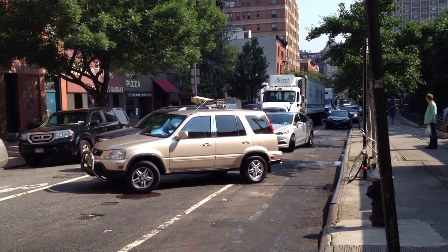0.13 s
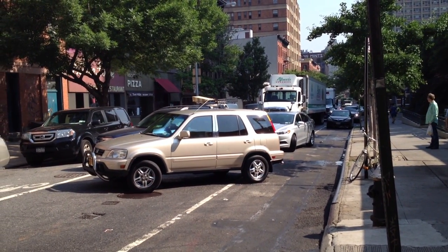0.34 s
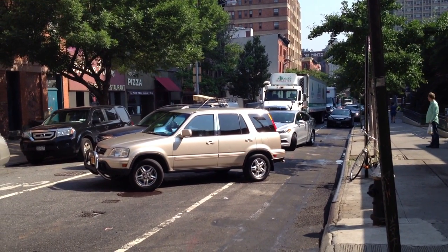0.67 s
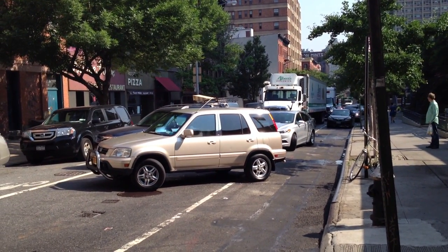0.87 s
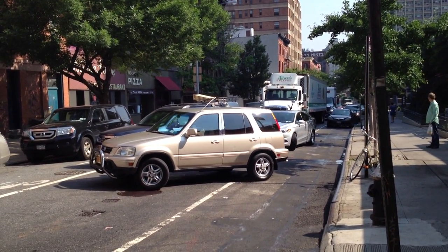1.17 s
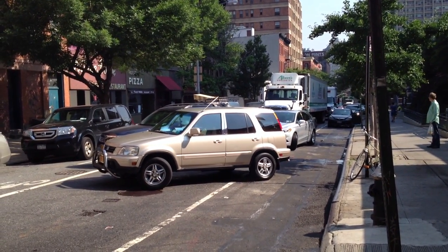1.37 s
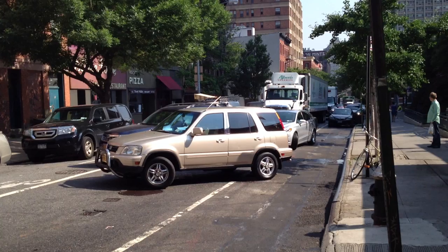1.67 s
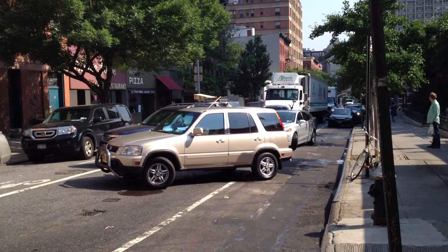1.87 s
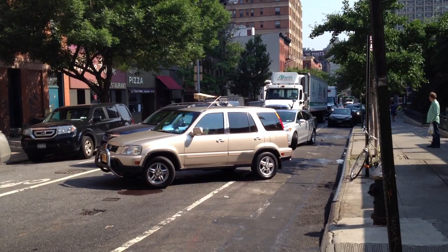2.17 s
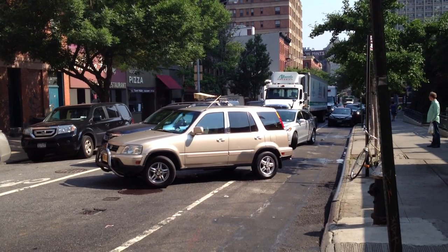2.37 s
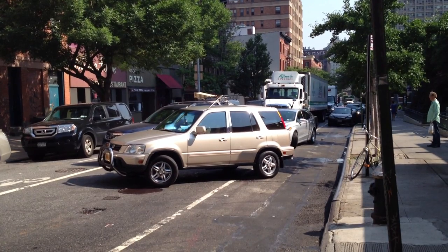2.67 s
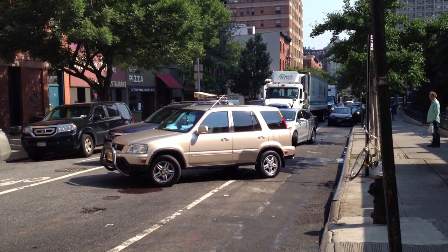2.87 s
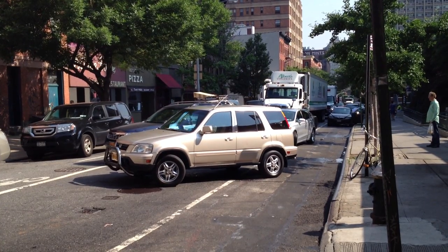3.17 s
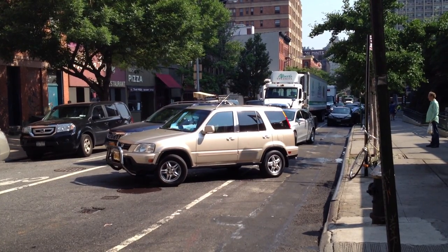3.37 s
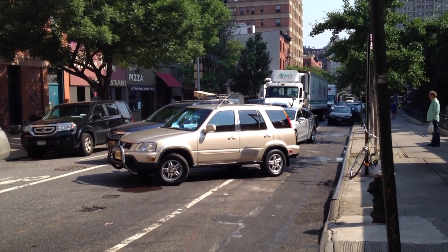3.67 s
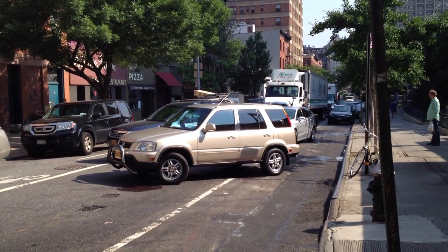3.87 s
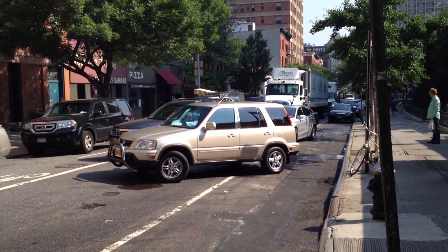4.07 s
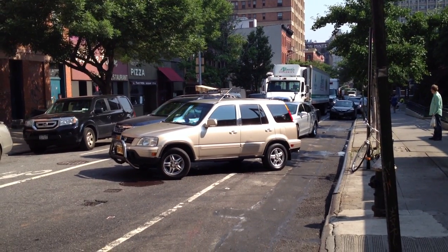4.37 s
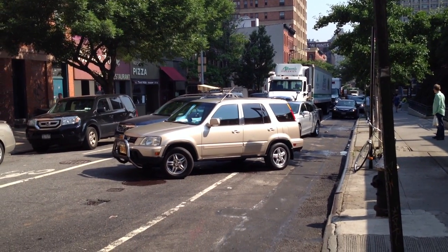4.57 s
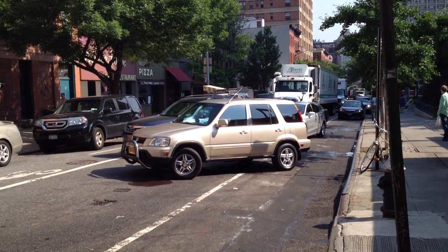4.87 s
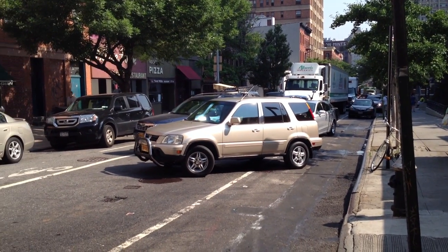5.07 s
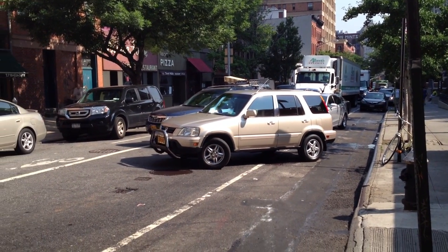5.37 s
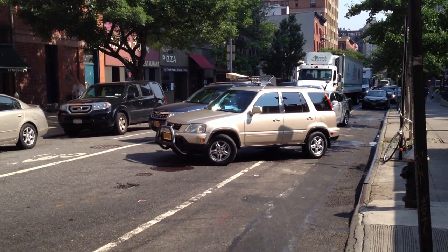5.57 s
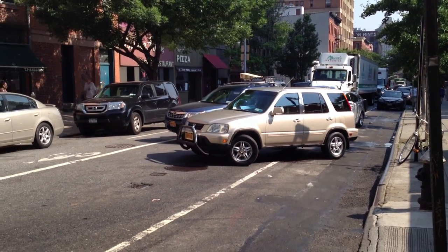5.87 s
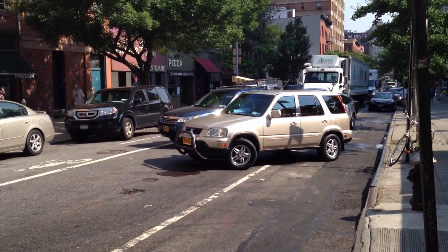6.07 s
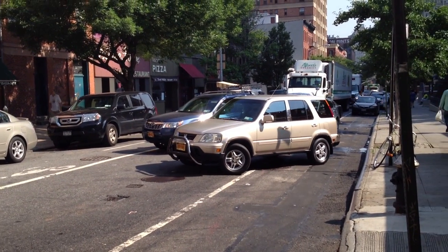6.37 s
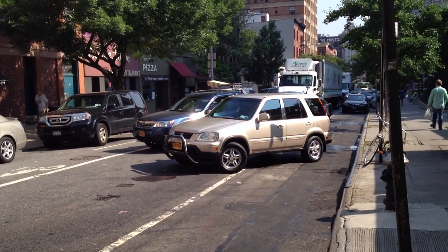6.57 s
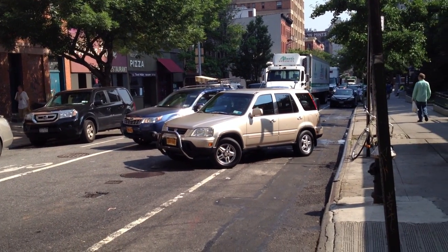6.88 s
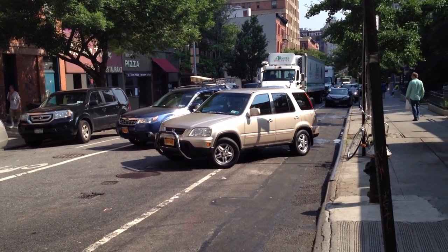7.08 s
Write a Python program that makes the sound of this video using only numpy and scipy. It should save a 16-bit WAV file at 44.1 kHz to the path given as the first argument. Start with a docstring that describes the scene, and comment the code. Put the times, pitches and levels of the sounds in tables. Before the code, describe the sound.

Dull hum of queued car and truck engines with faint brake squeals, a sharp handling knock, a loud pop, a dropout, then clearer traffic.

```python
"""A queue of cars and a truck idles in a city street: coloured noise for the many exhausts, fans and tyres,
wavering sines for the nearest engine and the truck, thin gliding sines for the brakes.
A finger partly covers the microphone port and muffles the street; it slides with a rub of filtered grains,
a sharp juddering knock of falling pitch and smaller catches of damped rings, and rests more loosely.
Then a pop, the sound drops out for most of a second, and the street returns open and bright."""
import sys
import numpy as np
from scipy import signal
from scipy.io import wavfile

SR = 44100
rng = np.random.default_rng(int(sys.argv[2]) if len(sys.argv) > 2 else 0)


def file_out(sig):
    """Save sig as 16-bit WAV at sys.argv[1]."""
    # one column per channel
    cols = np.atleast_2d(sig).T
    # limit, then scale
    lim = np.clip(cols, -1, 1)
    pcm = np.round(lim * 32767).astype(np.int16)
    wavfile.write(sys.argv[1], SR, pcm)


N = 318843
TIME = np.arange(N) / SR
SILENT_FROM_S, SILENT_TO_S = 5.834, 6.682

# traffic while the port is covered, loose and open, one list each:
# time [s], exhaust_rumble [dB], fan_and_tyre_noise [dB]
TRAFFIC_LEVELS = [
    [(0.0, -32.6, -35.4), (1.8, -32, -35.7), (3.6, -30.8, -35.2)],
    [(4.45, -33.4, -37), (5.1, -36.6, -34.5), (5.8, -37.6, -35.4)],
    [(6.72, -32.4, -37.4), (7.2, -31.6, -37.4)],
]


def street(spectrum):
    """Incoherent sum of many sources: exhaust noise below, fan and tyre noise above, each swelling on its own."""
    rumble_db, wash_db = in_time(np.vstack(TRAFFIC_LEVELS))
    noise = coloured(rng.standard_normal(N), spectrum)
    low = signal.sosfiltfilt(signal.butter(4, 600, fs=SR, output="sos"), noise)
    high = noise - low
    rumble = low / np.std(low) * from_db(rumble_db + 0.7 * drift(12))
    # the level of the upper part is set by what lies below 1800 Hz
    wash = high / np.std(band(high, 1800, "low")) * from_db(wash_db + 0.6 * drift(25))
    return rumble + wash


# spectrum of the street through a covered, a loosely covered and an open port: frequency [Hz], density [dB per Hz]
COVERED_SPECTRUM = [(40, -51.0), (65, -41.5), (115, -24.0), (175, -5.0), (340, -0.8), (510, -6.5),
                    (570, -6.0), (780, -10.5), (1250, -11.0), (1650, -17.5), (2250, -34.5), (3000, -42.5),
                    (3800, -45.5), (6000, -46.0), (7800, -55.0), (11500, -53.0), (15000, -56.0)]
LOOSE_SPECTRUM = [(40, -48), (65, -40), (115, -19), (165, -3), (300, 0), (450, -6), (850, -9), (1200, -7.3),
                  (1680, -7.3), (2200, -16.3), (3100, -23.5), (4000, -34), (6200, -36.5), (7700, -51),
                  (10500, -54.5), (14500, -50)]
OPEN_SPECTRUM = [(40, -35.5), (110, -13.0), (170, 2.0), (270, -1.5), (400, -3.0), (470, -12.0), (550, -5.5),
                 (950, -13.0), (2800, -18.5), (4700, -19.5), (5200, -24.0), (8400, -28.0), (9600, -33.0),
                 (13500, -36.0), (15000, -43.0)]
# resonance of the air gap under the finger: time [s], resonance [Hz], level [dB]
GAP_RESONANCE = [(0, 5600, -70), (3.6, 5590, -75), (4.35, 6014, -64), (4.52, 6000, -54), (4.85, 6000, -64),
                 (5.8, 5704, -62)]
LEAK_POWER = 3   # treble leaks in with the cube of the gap's width


def traffic():
    """Acoustic filtering by an aperture: the port colours the street, and the air gap under the finger resonates."""
    leak = looseness() ** LEAK_POWER
    # the two powers always add up to one
    muffled = np.sqrt(1 - leak) * street(COVERED_SPECTRUM) + np.sqrt(leak) * street(LOOSE_SPECTRUM)
    gap_hz, gap_db = in_time(GAP_RESONANCE)
    # slow noise on a carrier makes a narrow band of noise around the resonance
    gap = from_db(gap_db) * rms_one(drift(450) * np.sin(turning(gap_hz)))
    return np.where(TIME < SILENT_FROM_S, muffled + gap, street(OPEN_SPECTRUM))


# the nearest engine creeps up and sinks back: time [s], firing_rate [Hz]
FIRING_RATE = [(0, 97), (0.28, 95), (0.72, 101.5), (1.9, 98), (2.6, 103), (3.1, 105.6), (3.65, 101.3),
               (4.3, 102), (5.1, 92), (5.8, 90.9), (7.23, 101)]
# its deep firing tone: time [s], level [dB]
FIRING_TONE_LEVEL = [(0, -54), (0.45, -51.5), (0.78, -59), (1.05, -52.5), (1.48, -63), (1.85, -53),
                     (2.2, -68), (3.4, -61), (3.9, -56), (4.9, -57), (5.2, -65), (5.8, -62), (6.7, -53)]
# load on the engine, as the mean level of its exhaust note: time [s], level [dB]
EXHAUST_NOTE_LEVEL = [(0, -38), (0.33, -33.5), (0.53, -43), (0.76, -33), (0.95, -39), (1.65, -43),
                      (2.0, -36), (2.3, -36), (2.6, -32.5), (3.0, -30.5), (3.3, -35), (3.65, -32),
                      (4.1, -39), (4.45, -37), (5.0, -48), (7.23, -40)]
NOTE_WAVER_DB, OVERTONES_DB = 2.3, -48


def car_engine():
    """Whole and half orders of the firing rate turn with one engine; uneven firing makes the exhaust note and
    overtones waver in level and phase."""
    firing_hz, = in_time(FIRING_RATE)
    firing_db, = in_time(FIRING_TONE_LEVEL)
    note_db, = in_time(EXHAUST_NOTE_LEVEL)
    phase = turning(firing_hz)
    firing = from_db(firing_db) * np.sin(phase)
    note = from_db(note_db + NOTE_WAVER_DB * drift(7)) * np.sin(3 * phase + 0.55 * drift(9))
    overtones = np.zeros(N)
    for multiple in (3.5, 4, 4.5, 5.5):
        overtones += from_db(3 * drift(4)) * np.sin(multiple * phase + 0.8 * drift(5))
    return firing + note + from_db(OVERTONES_DB) * overtones


# the truck's drone: time [s], pitch [Hz]
TRUCK_PITCH_CURVE = [(0, 240), (0.6, 234), (1.0, 248), (2.7, 247), (3.7, 242), (4.2, 249), (4.9, 255),
                     (5.25, 267), (7.23, 261)]
DRONE_COVERED_DB, DRONE_LOOSE_DB, DRONE_OPEN_DB = -38.8, -41, -36.8   # level through each state of the port
TRUCK_SWELL_S, TRUCK_SWELL_DB = 1.0, 8   # it swells at the start as the truck takes up load
DRONE_WAVER_DB = 3.2


def truck_drone():
    """Amplitude and phase modulation of one tone: uneven firing makes the truck's drone waver."""
    truck_hz, = in_time(TRUCK_PITCH_CURVE)
    under_finger_db = DRONE_COVERED_DB + (DRONE_LOOSE_DB - DRONE_COVERED_DB) * looseness()
    level_db = np.where(TIME < SILENT_FROM_S, under_finger_db, DRONE_OPEN_DB)
    level_db = level_db - TRUCK_SWELL_DB * np.maximum(1 - TIME / TRUCK_SWELL_S, 0)
    return from_db(level_db + DRONE_WAVER_DB * drift(8)) * np.sin(turning(truck_hz) + 0.65 * drift(8))


# faint brake squeals: start [s], end [s], first_pitch [Hz], last_pitch [Hz], level [dB]
BRAKE_SQUEALS = [(-0.15, 0.25, 1700, 1716, -42), (0.1, 0.52, 1705, 1785, -49.5),
                 (0.45, 0.95, 1026, 1022, -44), (0.55, 0.95, 2042, 2040, -54), (0.6, 1.7, 1855, 1812, -54),
                 (4.9, 5.7, 1665, 1635, -45)]


def brakes():
    """Frictional squeal: thin tones that swell, glide and fade as cars creep forward."""
    out = np.zeros(N)
    for start_s, end_s, first_hz, last_hz, level_db in BRAKE_SQUEALS:
        progress = np.clip((TIME - start_s) / (end_s - start_s), 0, 1)
        pitch_hz = first_hz + (last_hz - first_hz) * progress
        tone = np.sin(turning(pitch_hz * (1 + 0.0015 * drift(8))))
        out += from_db(level_db + 1.5 * drift(10)) * np.sin(np.pi * progress) * tone
    return out


LOOSENS_FROM_S, LOOSENS_TO_S = 3.7, 5.08   # the finger eases off the port


def looseness():
    """Aperture width: 0 while the finger presses on the port, 1 once it has eased off."""
    return np.interp(TIME, [LOOSENS_FROM_S, LOOSENS_TO_S], [0, 1])


# strokes of the finger on the case; attack and release are the times for 20 dB:
# start [s], attack [s], hold [s], release [s], drag before its bass cut [dB], skin_hiss [dB]
FINGER_STROKES = [(3.65, .036, .06, .1, -46, -55), (3.742, .018, .02, .02, -37, -40),
                  (3.767, .03, .055, .25, -32.3, -34.5), (3.93, .11, .017, .04, -27, -41),
                  (3.995, .04, .103, .05, -24.7, -32.8), (4.125, .02, .036, .016, -29.5, -39),
                  (4.196, .026, .017, .012, -30, -28.5), (4.22, .01, .1, .2, -34.5, -52),
                  (4.335, .036, .025, .07, -38, -44.5), (4.45, .1, .38, .1, -46, -62),
                  (4.959, .008, .008, .02, -39, -43.5), (5.011, .01, .014, .1, -43, -46.5)]
# spectra of the drag (before its bass cut) and of the hiss: frequency [Hz], density [dB per Hz]
DRAG_SPECTRUM = [(40, -44), (90, -22), (170, 2), (500, -3.5), (1400, 2), (2400, -3), (3300, -22),
                 (6000, -38)]
HISS_SPECTRUM = [(1000, -15), (2500, 4.5), (3600, -0.5), (6000, 0.5), (8000, -7), (10000, -18.5),
                 (15000, -16.5)]


def finger_slide():
    """Stick-slip friction: thousands of tiny skin slips make a dull drag in the case and a hiss at the port."""
    drag_gain, hiss_gain = 0, 0
    for start_s, attack_s, hold_s, release_s, drag_db, hiss_db in FINGER_STROKES:
        pressure = swell(start_s, attack_s, hold_s, release_s)
        # overlapping strokes add in power
        drag_gain = np.hypot(drag_gain, from_db(drag_db) * pressure)
        hiss_gain = np.hypot(hiss_gain, from_db(hiss_db) * pressure)
    drag_grains = coloured(grains(per_s=3200, spread_db=2.8), DRAG_SPECTRUM)
    hiss_grains = coloured(grains(per_s=10000, spread_db=2.8), HISS_SPECTRUM)
    drag = drag_gain * from_db(1.6 * drift(60)) * drag_grains
    hiss = hiss_gain * from_db(1.2 * drift(60)) * hiss_grains
    return band(drag, 130, "high") + hiss


# the fingertip catches and lets go, before bass cut and overload:
# time [s], level [dB], ring_pitch [Hz], crisp_share [dB]
FINGERTIP_CATCHES = [(3.9335, -8, 1600, -14), (3.9435, -8, 1400, -16), (3.975, -8, 1300, -18),
                     (3.9775, -9, 2100, -16), (3.985, -9, 150, -30), (4.0195, -7, 1400, -18),
                     (4.033, -3, 190, -26), (4.0335, -4, 650, -14), (4.0398, -3, 1400, -12),
                     (4.049, -4, 1100, -14), (4.078, -9, 600, -18), (4.0925, -5, 1500, -14),
                     (4.096, -5, 2200, -14), (4.111, -6, 1400, -16), (4.199, -13, 2100, -3),
                     (4.206, -10, 2400, -2), (4.215, -10, 1700, -3), (4.2347, 1, 1600, -21),
                     (4.2363, -9, 2300, -16), (4.238, -11, 2100, -5), (4.243, -1, 2100, -21),
                     (4.283, -24, 2400, -4), (4.378, -9, 1500, -24), (4.39, -10, 2200, -18),
                     (4.438, -19, 2500, -22), (4.659, -22, 2700, -18), (4.678, -19.5, 2200, -17),
                     (4.804, -13.5, 1900, -19), (4.826, -23, 3000, -12), (4.864, -17, 2800, -22),
                     (4.938, -18, 2900, -10), (4.945, -24, 90, -30), (4.961, -19, 2200, -4),
                     (4.981, -17, 2200, -14), (5.3893, -13, 1900, -5), (5.633, -22, 2000, -8)]
BASS_CUT_HZ = 190
OVERLOAD = 0.82   # amplitude at which the microphone clips


def finger_catches():
    """Amplitude limiting: knocks and the judder overload the microphone, which passes little bass."""
    knocks = judder() + sum(knock(*row) for row in FINGERTIP_CATCHES)
    thinned = band(knocks, BASS_CUT_HZ, "high", order=2)
    return band(np.clip(thinned, -OVERLOAD, OVERLOAD), BASS_CUT_HZ / 2, "high", order=2)


# the sharp knock, as the fingertip judders over the port
JUDDER_START_S, JUDDER_LENGTH_S = 3.9791, 0.0056
JUDDER_FIRST_HZ, JUDDER_LAST_HZ = 1300, 330
JUDDER_DB = -0.5
JUDDER_OCTAVE_DB, JUDDER_RASP_DB, JUDDER_THUMP_DB = -7, -4, -4.5   # relative to the shudder
JUDDER_THUMP_HZ = 270
# spectrum of the skidding rasp: frequency [Hz], density [dB per Hz]
RASP_SPECTRUM = [(100, -6), (250, 3), (600, -3), (2500, 1), (4500, -4), (8000, -10), (15000, -15)]


def judder():
    """Stick-slip in a few hard shudders of falling pitch: the fingertip skids with a rasp and thumps the case."""
    moving = TIME > JUDDER_START_S
    progress = np.clip((TIME - JUDDER_START_S) / JUDDER_LENGTH_S, 0, 1)
    pitch_hz = JUDDER_FIRST_HZ + (JUDDER_LAST_HZ - JUDDER_FIRST_HZ) * progress
    phase = turning(pitch_hz * moving)
    shudder = np.sin(phase) + from_db(JUDDER_OCTAVE_DB) * np.sin(2 * phase)
    rasp = from_db(JUDDER_RASP_DB) * progress * coloured(rng.standard_normal(N), RASP_SPECTRUM)
    thump = from_db(JUDDER_THUMP_DB) * np.sin(turning(JUDDER_THUMP_HZ * moving))
    envelope = np.sqrt(np.abs(np.sin(np.pi * progress)))
    return from_db(JUDDER_DB) * envelope * (shudder + rasp + thump)


RING_S, RING_CYCLES = 0.0015, 3.5   # a ring falls 60 dB in this time plus a few cycles of its pitch
CAVITY_TOP_HZ = 3400   # the hollow under the finger passes little above this
EDGE_S = 0.004   # the crisp edge falls 60 dB in this time


def knock(start_s, level_db, ring_hz, crisp_db):
    """Damped cavity resonance: the hollow rings for a few cycles, and contact adds a crisp, broad edge."""
    age = TIME[:SR // 20]
    ring_t60 = RING_S + RING_CYCLES / ring_hz
    onset = np.minimum(2 * ring_hz * age, 1)   # soft skin takes half a cycle to drive the cavity
    ring = np.sin(2 * np.pi * ring_hz * age) * onset * np.exp(-np.log(1000) * age / ring_t60)
    ring = band(ring, CAVITY_TOP_HZ, "low", order=6)
    edge = band(rng.standard_normal(len(age)), 6000, "low", order=2)
    edge = edge * np.exp(-np.log(1000) * age / EDGE_S)
    out, at = np.zeros(N), round(start_s * SR)
    out[at:at + len(age)] = from_db(level_db) * (ring + from_db(crisp_db) * edge)
    return out


# faint ticks within the dropout: time [s], level [dB], ring_pitch [Hz], crisp_share [dB]
DROPOUT_TICKS = [(5.9485, -56, 2500, 4), (5.9993, -49, 1600, 2)]
# faint bumps within the dropout: time [s], level [dB]
DROPOUT_BUMPS = [(5.9375, -50), (5.9997, -48.5)]


def dropout(sound):
    """Gating: one hard pop, a brief faint crackle with ticks and bumps, then silence until the sound snaps back."""
    bumps = sum(bump(*row) for row in DROPOUT_BUMPS)
    ticks = sum(knock(*row) for row in DROPOUT_TICKS)
    live = (TIME < SILENT_FROM_S) | (TIME > SILENT_TO_S)
    return np.where(live, sound, pop_tail() + crackle() + bumps + ticks) + pop()


POP_S, POP_DB = 5.8336, -0.8
POP_PUSH_S, POP_FALL_S = 0.000105, 0.00066


def pop():
    """Bipolar impulse: it jumps up, flips to the opposite extreme and runs back to rest."""
    corners_s = np.cumsum([0, 1.5 / SR, POP_PUSH_S, 1.5 / SR, POP_FALL_S])
    return from_db(POP_DB) * np.interp(TIME - POP_S, corners_s, [0, 1, 1, -1, 0])


POP_TAIL_DB, POP_TAIL_S = -54, 0.05   # level before the low-pass; time to fall 20 dB
POP_TAIL_ENDS_S = 5.867   # where it is cut short


def pop_tail():
    """Exponential decay of low-passed noise: the dull tail of the pop."""
    noise = band(coloured(rng.standard_normal(N), COVERED_SPECTRUM), 1400, "low", order=8)
    decay = swell(POP_S, POP_PUSH_S, POP_FALL_S, POP_TAIL_S)
    return from_db(POP_TAIL_DB) * decay * noise * (TIME < POP_TAIL_ENDS_S)


CRACKLE_START_S, CRACKLE_HOLD_S, CRACKLE_RELEASE_S, CRACKLE_DB = 5.937, 0.153, 0.018, -69
# spectrum of the crackle: frequency [Hz], density [dB per Hz]
CRACKLE_SPECTRUM = [(40, -14), (150, -8), (400, -9), (1500, -12), (5000, -10), (15000, -10)]


def crackle():
    """Random impulse train: dense tiny clicks of uneven size, filtered to a faint crackle."""
    clicks = coloured(grains(per_s=6000, spread_db=4.6), CRACKLE_SPECTRUM)
    return from_db(CRACKLE_DB) * swell(CRACKLE_START_S, 0.004, CRACKLE_HOLD_S, CRACKLE_RELEASE_S) * clicks


BUMP_HZ, BUMP_FALL_S = 160, 0.008   # swing of a bump; time to fall 20 dB


def bump(start_s, level_db):
    """Damped step response: a crisp edge that swings back to rest with a short thud."""
    age = np.maximum(TIME - start_s, 0)
    swing = (TIME > start_s) * np.cos(2 * np.pi * BUMP_HZ * age)
    return from_db(level_db) * swing * swell(start_s, BUMP_FALL_S, 0, BUMP_FALL_S)


def swell(start_s, attack_s, hold_s, release_s):
    """Exponential envelope: 1 from the start for the hold; attack and release are the times for 20 dB."""
    before = np.maximum(start_s - TIME, 0) / attack_s
    after = np.maximum(TIME - start_s - hold_s, 0) / release_s
    return from_db(-20 * np.minimum(before + after, 10))


def from_db(db):
    """Logarithmic level: decibels to amplitude gain."""
    return 10 ** (np.asarray(db) / 20)


def rms_one(x):
    """Normalisation by effective value: scale to rms 1."""
    return x / np.sqrt(np.mean(x ** 2) + 1e-20)


def in_time(rows):
    """Linear interpolation: each column of a curve table at every sample."""
    time_s, *columns = np.transpose(rows)
    return [np.interp(TIME, time_s, column) for column in columns]


def coloured(x, spectrum):
    """Spectral shaping: weight the Fourier bins of a steady signal, then scale to rms 1."""
    hz, db = np.transpose(spectrum)
    bins_hz = np.maximum(np.arange(N // 2 + 1) * SR / N, 1)
    gain = from_db(np.interp(np.log(bins_hz), np.log(hz), db))
    return rms_one(np.fft.irfft(np.fft.rfft(x) * gain, N))


def band(x, edges_hz, kind, order=4):
    """Butterworth filtering: maximally flat in its pass band."""
    return signal.sosfilt(signal.butter(order, edges_hz, kind, fs=SR, output="sos"), x)


def drift(rate_hz):
    """Low-passed noise: slow chance fluctuation of rms 1."""
    noise = rng.standard_normal(N + SR)   # the first second lets the filter settle
    return rms_one(band(noise, rate_hz, "low", order=2)[SR:])


def turning(hz):
    """Phase as the integral of frequency, for something that turns at a changing rate."""
    return 2 * np.pi * np.cumsum(hz) / SR


def grains(per_s, spread_db):
    """Random point process: clicks of uneven size and either sign."""
    sizes = from_db(spread_db * np.minimum(rng.exponential(1, N), 4))
    signs = rng.choice([-1, 1], N)
    return sizes * signs * (rng.random(N) < per_s / SR)


def scene():
    """Superposition: the street and the finger meet at one microphone."""
    vehicles = traffic() + car_engine() + truck_drone() + brakes()
    finger = finger_slide() + finger_catches()
    return dropout(vehicles + finger)[None]


CUTOFF_HZ = 15450


def record(dry):
    """Band limitation: a steep linear-phase filter cuts the top."""
    lowpass = signal.firwin(255, CUTOFF_HZ, fs=SR, window="blackman")
    return signal.fftconvolve(dry, lowpass[None], "same")


dry = scene()
out = record(dry)
file_out(out)
```